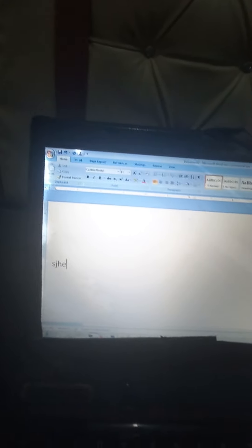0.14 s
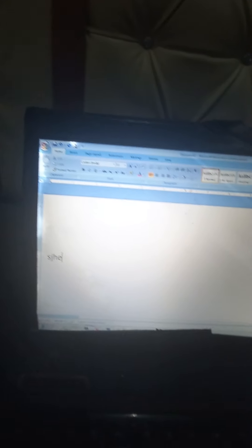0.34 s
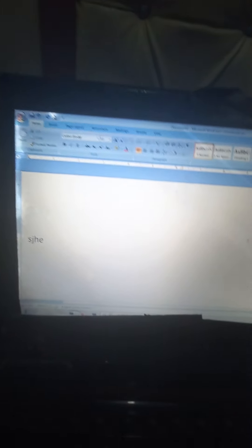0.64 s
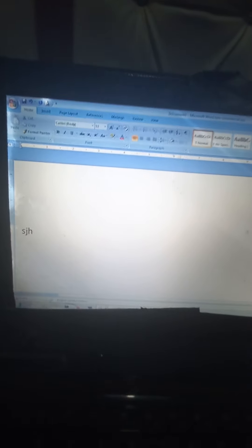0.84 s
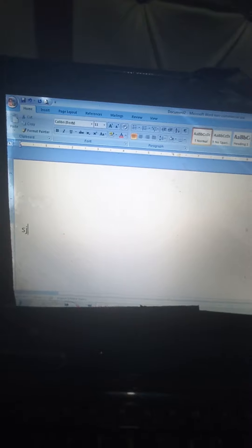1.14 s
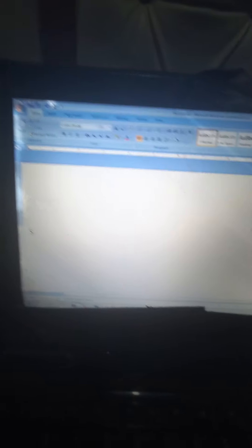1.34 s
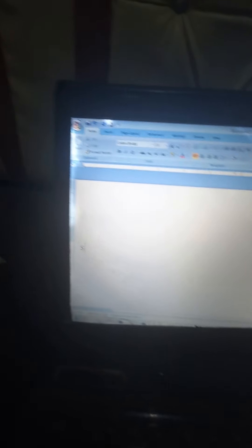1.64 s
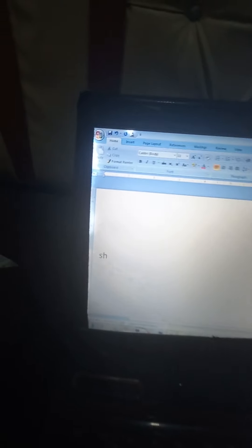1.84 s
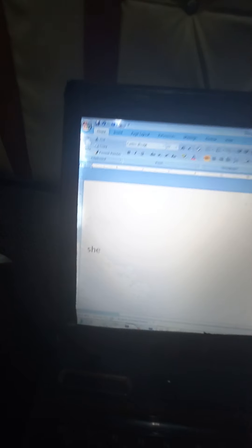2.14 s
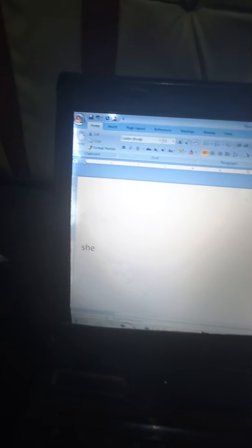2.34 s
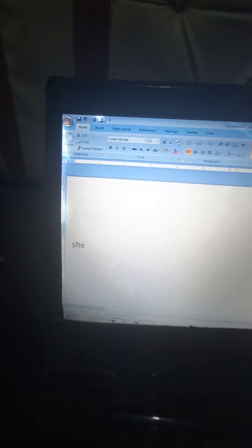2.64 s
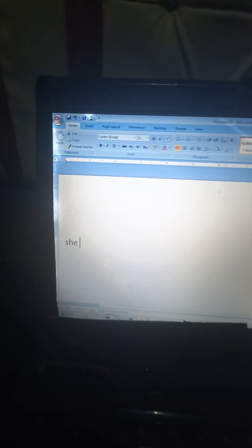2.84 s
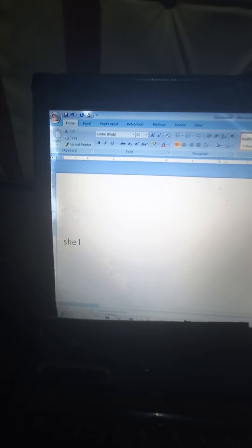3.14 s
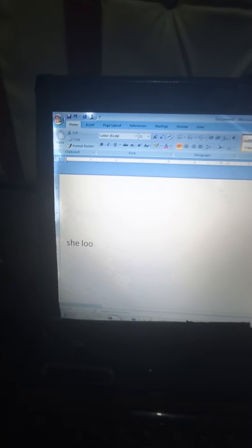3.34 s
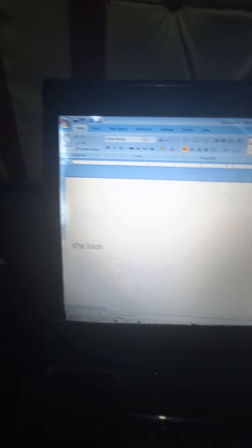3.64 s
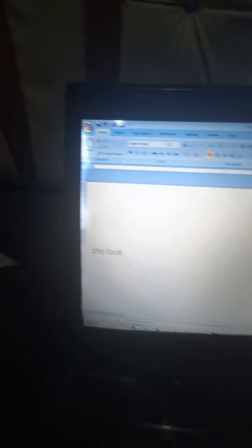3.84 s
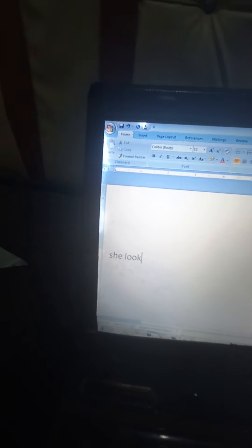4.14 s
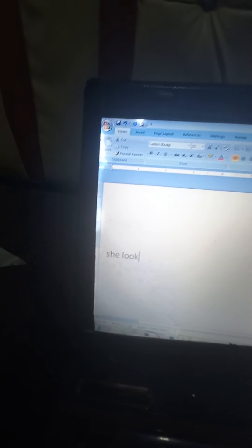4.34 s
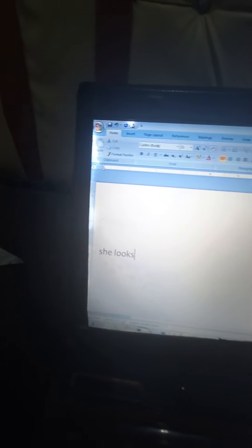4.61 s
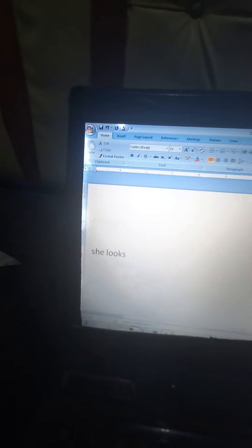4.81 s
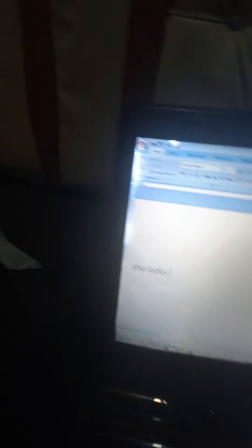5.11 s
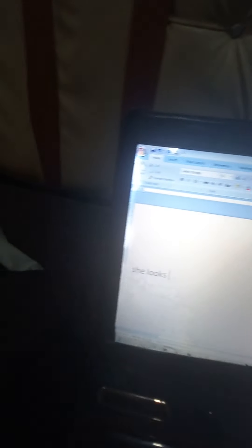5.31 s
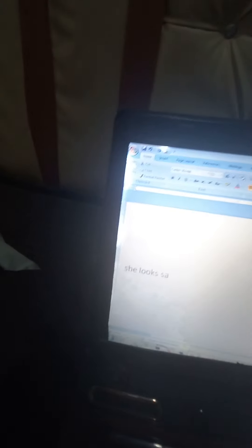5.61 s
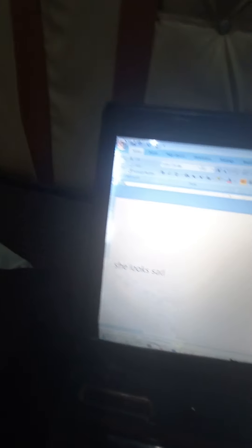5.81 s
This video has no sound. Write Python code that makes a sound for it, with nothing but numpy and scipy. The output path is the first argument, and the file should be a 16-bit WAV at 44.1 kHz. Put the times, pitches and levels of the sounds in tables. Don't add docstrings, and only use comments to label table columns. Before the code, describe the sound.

A hand-held microphone near a laptop keyboard catches about fifteen unhurried keystrokes: crisp tick, rattle, low case thud, weak release click. A wider, looser key clacks just after two seconds, and a firm cluster comes around four and a half. Air puffs thump and flutter unevenly at both sides, stronger on the left, above quiet fan hiss, deep hum and a short room tail.

```python
import sys
import numpy as np
from scipy import signal
from scipy.fft import rfft, irfft
from scipy.io import wavfile
from scipy.ndimage import uniform_filter1d

SR = 44100
rng = np.random.default_rng(int(sys.argv[2]) if len(sys.argv) > 2 else 0)


def volts_from_db(level):
    exponent = np.asarray(level, float) / 20
    return 10 ** exponent


def inscribe(sig):
    pcm = np.round(np.clip(np.atleast_2d(sig).T, -1, 1) * 32767)
    wavfile.write(sys.argv[1], SR, pcm.astype(np.int16))


N = 263056
TIME = np.arange(N) / SR


def rms_one(x):
    return x / np.sqrt(np.mean(x ** 2) + 1e-20)


def peak_one(x):
    return x / np.sqrt(np.max(uniform_filter1d(x ** 2, size=50)) + 1e-20)


def energy_one(x):
    return x / np.sqrt(np.sum(x ** 2, axis=1, keepdims=True))


def at_hz(points, hz):
    points = np.array(points)
    return np.interp(np.log(hz), np.log(points[:, 0]), points[:, 1])


def butter(x, hz, kind, order=2):
    return signal.sosfilt(signal.butter(order, hz, kind, fs=SR, output="sos"), x)


def ring(x, hz, t60):
    r, w = volts_from_db(-60 / (t60 * SR)), 2 * np.pi * hz / SR
    return signal.lfilter([.5, 0, -.5], [1, -2 * r * np.cos(w), r * r], x + 1e-18)


def ring_modes(x, modes):
    return np.array([volts_from_db(db) * ring(x, hz, t60) for hz, db, t60 in modes])


def add(out, sound, s):
    i = round(s * SR)
    piece = sound[..., max(-i, 0):N - i]
    out[..., max(i, 0):max(i, 0) + piece.shape[-1]] += piece


# pitch_hz, density_db (per Hz)
FAN_COLOUR = [(90, -33), (150, -62), (254, 2), (420, -2.5), (535, -8.5), (840, -7), (1500, -10.5),
              (1950, -8.5), (3350, -14.5), (4080, -24.5), (5520, -25), (6900, -33), (8350, -25.5),
              (9500, -30), (16000, -33.5)]
# pitch_hz, likeness (-1 to 1)
FAN_LIKENESS = [(150, 0.81), (300, 1), (640, 0.11), (1400, -0.31), (4000, -0.0012)]
# pitch_hz, left_minus_right_db
FAN_BALANCE = [(200, -8.5), (500, -1), (2400, -6), (5000, -6), (9000, -2), (15000, -6.5)]


def fan():
    hz = np.maximum(np.fft.rfftfreq(N, 1 / SR), 20)
    mid, side = rfft(rng.standard_normal((2, N)))
    alike = np.clip(at_hz(FAN_LIKENESS, hz), -1, 1)
    pan = volts_from_db(at_hz(FAN_BALANCE, hz) / 2 * np.array([[1], [-1]]))
    ports = np.sqrt(1 + alike) * mid + np.sqrt(1 - alike) * side * [[1], [-1]]
    air = pan * volts_from_db(at_hz(FAN_COLOUR, hz)) * ports
    return volts_from_db(-48) * rms_one(irfft(air * (hz < 15950), N))


# start_s, level_db
HUM = [(0.0, -56), (0.9, -81), (1.24, -53), (2.1, -50), (2.39, -40), (2.8, -50), (3.1, -61), (3.9, -38),
       (4.6, -37), (5.19, -46), (5.66, -68), (5.96, -48)]


def rumble():
    s, db = np.transpose(HUM)
    hz, t60_s = 48.54, 0.67
    hum = ring(ring(rng.standard_normal(N + SR), hz, t60_s), hz, t60_s)[SR:]
    return volts_from_db(np.interp(TIME, s, db) - 4.0) * rms_one(hum)


def eddies(count, hz, uneven=.12, hiss=.2):
    gaps = (1 + uneven * np.clip(rng.standard_normal(count // 40), -2, 2)) * SR / hz
    at = np.cumsum(gaps).astype(int)
    train = np.zeros(count)
    sizes = -volts_from_db(rng.normal(0, 4.73, len(at)))
    train[at[at < count]] = sizes[at < count]
    width = .19 * SR / hz
    dips = np.convolve(train, np.exp(-(np.arange(-300, 301) / width) ** 2), "same")
    noise = butter(rng.standard_normal(count), 1.61 * hz, "low", order=4)
    flow = butter(rms_one(dips) + hiss * rms_one(noise), 63.6, "high", order=3)
    return rms_one(butter(flow[::-1], 64.0, "high", order=3)[::-1])


PUFF_MS, PUFF_HZ = 20.5, 117.9


def puffs(draught_db):
    count = 30
    luck = rng.standard_normal((count, 4))
    s = (np.arange(count) + .5 + .3 * luck[:, 0]) * TIME[-1] / count
    db = np.interp(s, TIME, draught_db) + 6.5 + 3.5 * luck[:, 1]
    return list(zip(s, db, PUFF_MS * volts_from_db(1.9 * luck[:, 2]), PUFF_HZ * volts_from_db(0.99 * luck[:, 3])))


def wind(gusts, draught_db):
    lumps_db = 1.1 * rms_one(butter(rng.standard_normal(N), 22.0, "low"))
    out = volts_from_db(draught_db + lumps_db) * eddies(count=N, hz=107.24, uneven=.25, hiss=0.53)
    t = np.arange(-4000, 4000) / SR
    for s, db, ms, eddy_hz in gusts + puffs(draught_db):
        swell_s = np.where(t < 0, .45, .8) * ms / 1000
        swell = np.exp(-(t / swell_s) ** 2)
        flow = eddies(count=9000, hz=.85 * eddy_hz)[1000:]
        ripple = rms_one(butter(rng.standard_normal(9000), [220, 480], "band", order=4)[1000:])
        flow = flow + volts_from_db(0.6 * db - 2.0) * ripple
        flow = flow / np.sqrt(np.sum((flow * swell) ** 2) / np.sum(swell ** 2))
        add(out, volts_from_db(db) * swell * flow, s + t[0])
    return out


# start_s, left_db, right_db
DRAUGHT = [(0, -37, -47), (.3, -34.5, -51), (.46, -46, -55), (.75, -41, -50), (1.201, -41, -46.5),
           (1.42, -48.5, -47.5), (1.88, -50.5, -45), (2.2, -37, -35.5), (2.5, -42, -44), (2.95, -39.5, -43),
           (3.35, -41, -45), (3.7, -41, -44.5), (4.05, -35, -45), (4.6, -36.5, -39.5), (4.85, -38.5, -41.5),
           (4.97, -48.5, -55), (5.35, -36, -40), (5.96, -47, -43.5)]
# peak_s, level_db, length_ms, eddy_rate_hz
GUSTS_LEFT = [(0.127, -26, 14, 111.2), (0.175, -19.5, 11, 185.4), (0.27, -22.5, 47, 105.4),
              (0.56, -22.5, 52, 100.6), (0.792, -24, 35, 121.5), (0.861, -27, 59, 101.1),
              (0.983, -16.5, 26.6, 236), (1.036, -23.5, 48, 167.3), (1.092, -23, 43, 120),
              (1.135, -24.5, 36, 100.8), (1.321, -29.5, 47, 109.8), (2.072, -26, 23, 120.6),
              (2.209, -25.5, 38, 130.3), (2.815, -24, 13.5, 113.5), (3.076, -19.5, 17, 157.7),
              (3.526, -22.5, 19, 111.7), (4.072, -24, 46, 115.5), (4.164, -18, 14, 200.8),
              (4.405, -23.5, 40, 156.8), (4.46, -25, 26, 131.2), (4.562, -24.5, 37, 137.3),
              (4.714, -25.5, 26, 115.4), (4.793, -20, 10, 158.8), (5.044, -26.5, 24, 127),
              (5.252, -27.5, 28, 161.8), (5.487, -30.5, 36, 109.3), (5.606, -24.5, 11.6, 157.2),
              (5.71, -25.5, 10.4, 119), (5.764, -23.5, 16, 136.5), (5.92, -18.5, 18, 140)]
# peak_s, level_db
PUFFS_LEFT = [(0.206, -33), (0.357, -31), (0.535, -19.5), (0.945, -30), (2.428, -29.5), (2.643, -29.5),
              (2.713, -28.5), (2.873, -33), (3.005, -28.5), (3.333, -30.5), (3.38, -29), (3.649, -29),
              (3.876, -29.5), (3.931, -23.5), (3.973, -30.5), (4.13, -20), (4.209, -33), (4.686, -23.5),
              (4.76, -28), (4.838, -30), (5.111, -32.5), (5.225, -25.5), (5.315, -31), (5.407, -31),
              (5.437, -24.5), (5.555, -30), (5.68, -33), (5.838, -36)]
# peak_s, level_db, length_ms
GUSTS_RIGHT = [(0.288, -37, 65), (1.269, -27, 27), (1.946, -32, 26), (2.019, -32, 16), (2.105, -32, 45),
               (2.18, -23, 46), (2.357, -28, 21), (2.395, -33, 15), (2.716, -31.5, 22), (2.868, -36, 21),
               (3.282, -31, 25), (3.382, -29.5, 34), (3.508, -27.5, 60), (3.73, -34, 26), (3.984, -30, 20),
               (4.196, -33, 37), (4.45, -37, 20), (4.83, -35.5, 37), (5.261, -32, 20), (5.505, -35, 33),
               (5.652, -33, 31)]


def draught():
    s, left_db, right_db = np.transpose(DRAUGHT)
    left_gusts = GUSTS_LEFT + [(*puff, PUFF_MS, PUFF_HZ) for puff in PUFFS_LEFT]
    right_gusts = [(*gust, 106.77) for gust in GUSTS_RIGHT]
    left = wind(left_gusts, np.interp(TIME, s, left_db))
    right = wind(right_gusts, np.interp(TIME, s, right_db))
    return np.array([left, right])


# start_s, rattle_db
TOUCHES = [(0.6706, -30), (0.8374, -36), (1.142, -20), (1.7438, -31), (2.0516, -34), (2.899, -29),
           (3.1349, -28.5), (3.565, -35), (4.3434, -23), (4.596, -31), (4.606, -19.5), (5.2974, -41),
           (5.301, -46), (5.3124, -33), (5.503, -24), (5.753, -27)]
# start_s, rattle_db, cap_db, cap_pitch_hz,
# hinge_db
PRESSES = [(0.6758, -13, -16, 1880, -31), (0.848, -22.5, -23.5, 1650, -57), (1.1458, -12, -13.5, 1620, -30),
           (1.225, -55, -32, 1350, -62), (1.75, -31.5, -32.5, 1090, -52), (2.0568, -22, -22, 1940, -28.5),
           (2.9042, -23, -21.5, 1335, -31.5), (3.139, -22, -25, 1870, -34.5),
           (3.5724, -28.5, -30, 1810, -38), (4.347, -13, -17, 2060, -17), (4.601, -13, -17.5, 1880, -32.5),
           (4.61, -29, -30.5, 880, -32), (4.7249, -28.5, -34, 2840, -42), (5.508, -23, -22.5, 1640, -50),
           (5.7565, -16.5, -14.5, 2090, -36)]
# start_s, rattle_db, cap_db, rattle_length_ms
RELEASES = [(0.7676, -32, -37, 5.2), (0.927, -35, -35, 5.9), (1.2302, -37, -52, 7.8),
            (1.827, -44, -57, 1.6), (1.8497, -41, -54, 3.7), (2.134, -50, -50, 5.6), (2.145, -45, -45, 6.2),
            (2.969, -46, -52, 2.6), (2.996, -46, -50, 4.5), (3.007, -47, -54, 2), (3.2456, -50, -57, 2.5),
            (3.261, -43, -43, 5.5), (3.351, -40.5, -44, 2.8), (5.405, -44, -51, 1.6),
            (5.4126, -36.5, -40, 3), (5.599, -46, -47, 1.4), (5.605, -47, -46, 7.6), (5.611, -55, -43, 1.5),
            (5.8436, -51, -52, 3.8)]
# start_s, rattle_db, cap_db, wire_db, rattle_length_ms
WIDE_KEYS = [
    (2.2057, -16.5, -37, -25.5, 2.2),
    (2.21, -25, -25, -29, 4.6),
    (2.2149, -23, -20, -51, 1.2),
    (2.323, -24, -33.5, -28, 6.2),
    (4.7199, -24, -50, -55, 2.8),
    (5.308, -30.5, -28.5, -32.5, 3.1),
]


def contacts():
    hinge_hz, wire_hz, light_cap_hz, wide_cap_hz = 3720, 5620, 1850, 2070
    rows = [(*press, hinge_hz, 2.7) for press in PRESSES]
    for s, db, cap_db, wire_db, ms in WIDE_KEYS:
        rows.append((s, db, cap_db, wide_cap_hz, wire_db, wire_hz, ms))
    for s, db in TOUCHES:
        rows.append((s, db, db - 8, light_cap_hz, db - 9, wire_hz, 1.9))
    for s, db, cap_db, ms in RELEASES:
        rows.append((s, db, cap_db, light_cap_hz, db - 12, wire_hz, ms))
    return rows


# pitch_hz, level_db, t60_s
PLATE = [(8040, 1, 0.0031), (8670, 2, 0.0025), (10150, -10.5, 0.0024), (11700, 10.5, 0.0013),
         (15000, 5, 0.0014), (16600, 6, 0.00088)]
# pitch_hz, level_db, t60_s
DECK = [(615, -23, 0.044), (905, -4, 0.011), (1247, 4.5, 0.0097), (1543, -9.5, 0.029), (1836, 4, 0.0093),
        (2460, -8, 0.017), (2842, -4.5, 0.02)]


def keys():
    out, t = np.zeros((3, N)), np.arange(1500) / SR
    port_lag = 13
    for s, rattle_db, cap_db, cap_hz, hinge_db, hinge_hz, ms in contacts():
        age = t / (ms / 1000)
        shape = age ** 0.9 * np.exp(-3.2 * age)
        knocks = rng.standard_normal(1500) * (rng.random(1500) < .45) * shape

        spray = butter(knocks, [6300, 16300], "band")
        plate = butter(ring_modes(knocks, PLATE), 5700, "high")
        left, right = volts_from_db(rng.normal(0, 2.3, (2, len(PLATE)))) @ plate + 0.93 * spray
        left = butter(left, 16500, "low", order=1)

        hinge = ring(knocks, hinge_hz, .003) + .4 * ring(knocks, 4700, .002)
        hinge = volts_from_db(hinge_db) * peak_one(hinge)

        push = .5 * knocks / np.max(abs(knocks)) + np.exp(-((t - .0005) / .0001) ** 2)
        deck = volts_from_db(rng.normal(0, 2.5, (2, len(DECK)))) @ ring_modes(push, DECK)
        own = butter(ring(push, cap_hz, .017), [.75 * cap_hz, 1.3 * cap_hz], "band", order=1)
        cap = own + volts_from_db(.55 * (cap_db + 15)) * deck
        cap = volts_from_db(cap_db) * np.array([peak_one(c) for c in cap])

        near = volts_from_db(rattle_db) * peak_one(right) + hinge + cap[1]
        far = volts_from_db(rattle_db - 18.5) * peak_one(left) + volts_from_db(-10) * hinge
        far = far + volts_from_db(-10.0) * butter(cap[0], 2200, "low", order=1)

        tick = np.sqrt(ms) * (t == 0)
        wide = volts_from_db(rattle_db + 10.5) * butter(tick, [6000, 16300], "band")
        wide = wide + volts_from_db(hinge_db + 17.5) * butter(tick, [3000, 6000], "band")
        wide = wide + volts_from_db(cap_db - 7.0) * peak_one(deck[0])
        add(out, np.array([np.roll(far, port_lag), near, wide]), s - .0003)
    return out


# start_s, peak_db, case_pitch_hz
THUDS = [(0.675, -37, 186), (0.848, -40, 188), (1.147, -26, 269), (1.751, -28, 355), (1.849, -37.5, 390),
         (2.058, -28.5, 354), (2.213, -20.5, 268), (2.325, -24.5, 229), (2.906, -31.5, 260),
         (3.139, -29, 255), (3.573, -29, 243), (4.347, -26, 267), (4.601, -21, 227), (4.698, -26, 293),
         (4.72, -29, 249), (5.507, -30.5, 350), (5.756, -17.5, 334)]


def thuds():
    out, t = np.zeros((2, N)), np.arange(5000) / SR
    for s, peak_db, case_hz in THUDS:
        blow = np.exp(-((t - .001) / 0.00062) ** 2)
        body = ring(blow, case_hz, 0.037)
        body = body + .5 * ring(blow, 1.67 * case_hz, 0.046)
        body = body + 0.59 * ring(blow, 646, 0.041)
        add(out, volts_from_db(peak_db) * body / np.max(abs(body)) * volts_from_db([[-6], [0]]), s)
    return out


# delay_s, level_db
ECHOES = [
    (0.018, -20),
    (0.028, -30),
    (.036, -22.5),
]


def room(x):
    t60_s, tail_db = 0.35, -10.5
    t = np.arange(SR // 2) / SR
    tail = rng.standard_normal((2, len(t))) * volts_from_db(-60 * t / t60_s) * np.clip(t / 0.0097, 0, 1) ** 3
    clumps_db = 3 * np.repeat(rng.standard_normal((2, len(t) // 90)), 90, axis=1)
    tail = volts_from_db(tail_db) * energy_one(tail * volts_from_db(clumps_db))
    for lag, db in ECHOES:
        smear = rng.standard_normal((2, 200)) * np.exp(-np.arange(200) / 60)
        add(tail, volts_from_db(db) * energy_one(smear), lag)
    return signal.fftconvolve(x[None], tail * volts_from_db([[-4], [0]]), axes=1)[:, :N]


def slide():
    swish = rms_one(butter(rng.standard_normal((2, N)), [6500, 13000], "band"))
    return volts_from_db([[-70], [-62]]) * swish * np.exp(-((TIME - 3.65) / 0.12) ** 2)


def scene():
    ports = draught()
    clicks, blows = keys(), thuds()
    tail = room(butter(clicks[2] + blows[1], 15800, "low", order=8))
    return clicks[:2] + blows + tail + ports + fan() + rumble() + slide()


def low_pass(x):
    return signal.sosfilt(signal.butter(12, 17320, fs=SR, output="sos"), x)


def record(dry):
    cut = signal.sosfilt(signal.cheby2(10, 60, 17200, fs=SR, output="sos"), dry)
    cut = butter(cut, 47, "high", order=10)
    return low_pass(cut)


dry = scene()
out = record(dry)
inscribe(out)
```